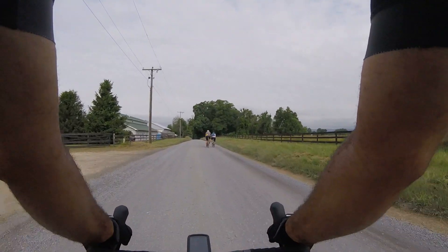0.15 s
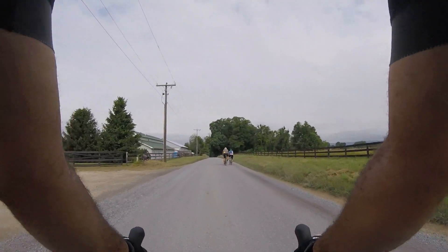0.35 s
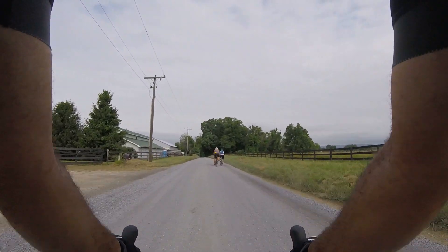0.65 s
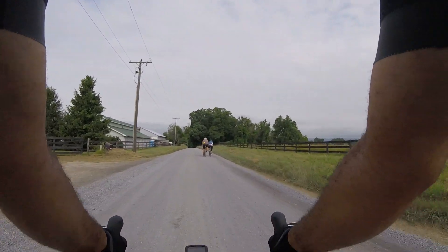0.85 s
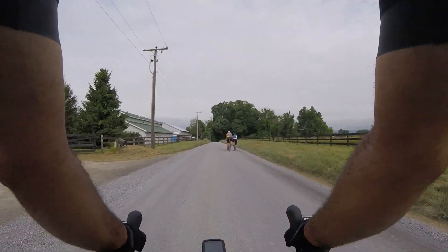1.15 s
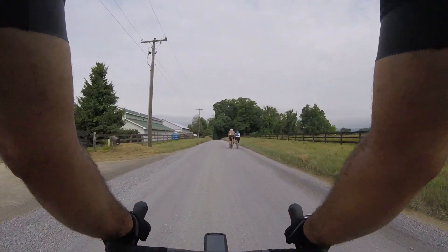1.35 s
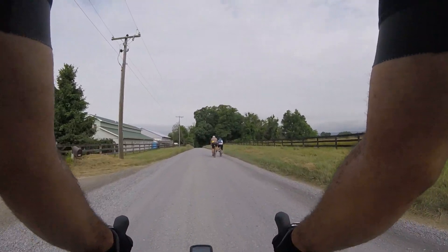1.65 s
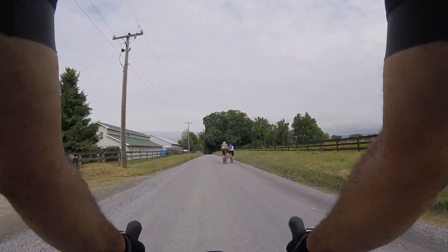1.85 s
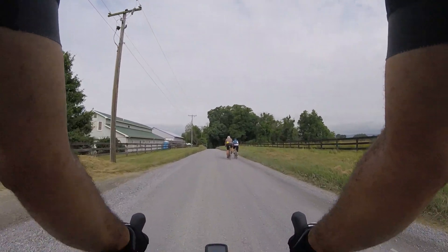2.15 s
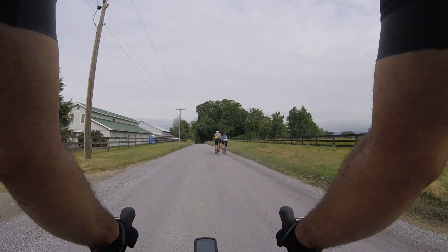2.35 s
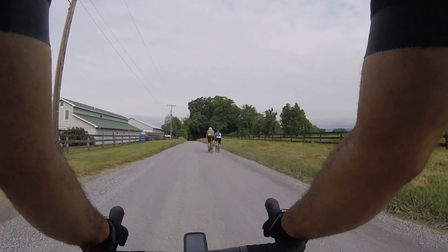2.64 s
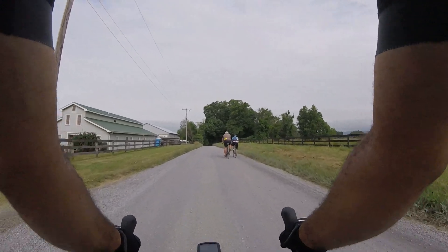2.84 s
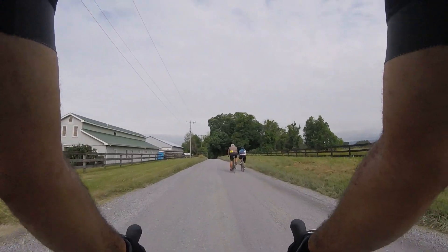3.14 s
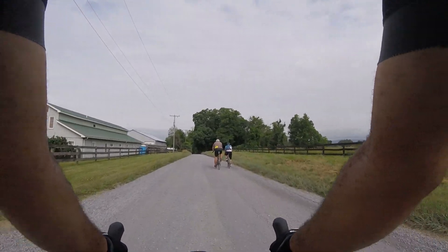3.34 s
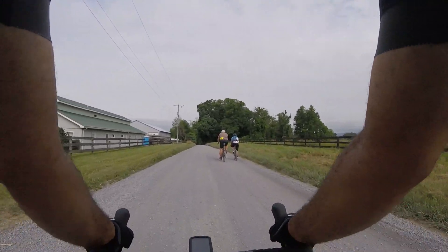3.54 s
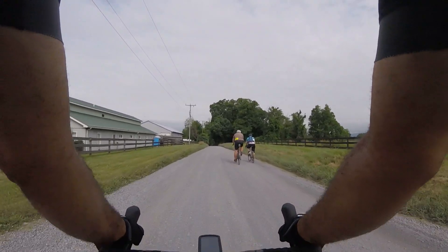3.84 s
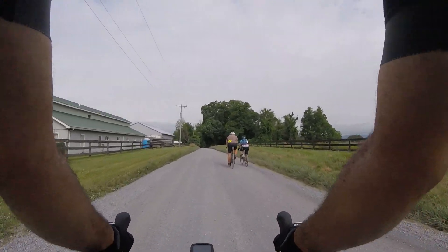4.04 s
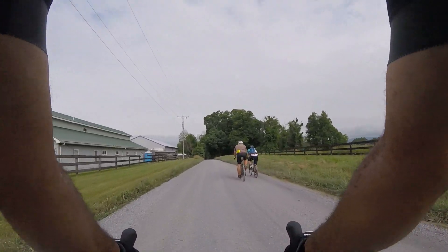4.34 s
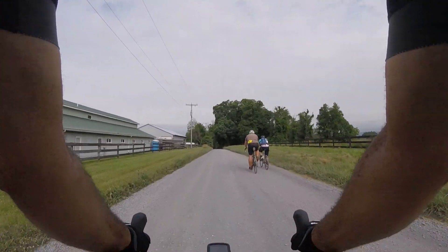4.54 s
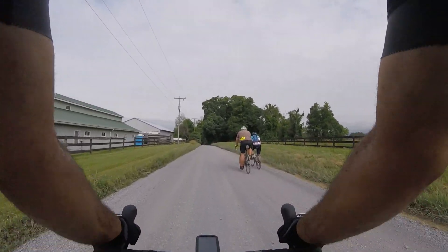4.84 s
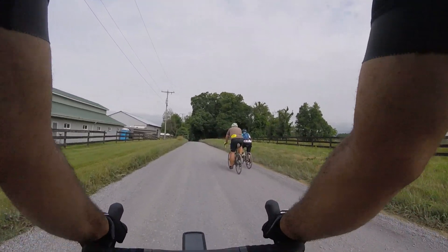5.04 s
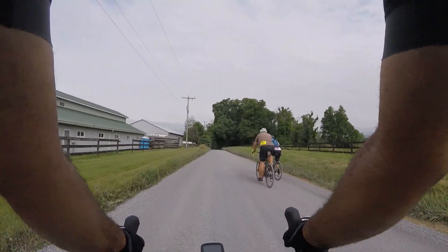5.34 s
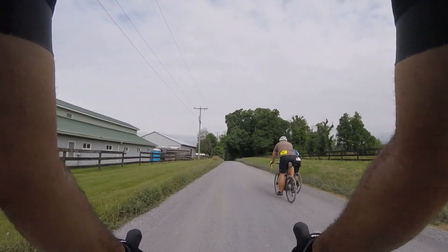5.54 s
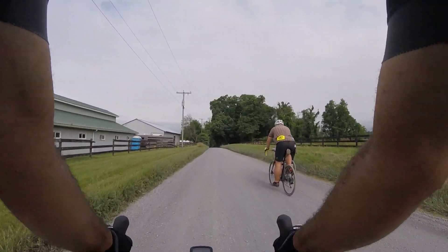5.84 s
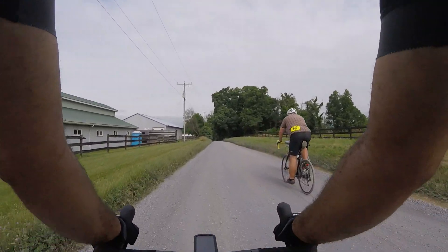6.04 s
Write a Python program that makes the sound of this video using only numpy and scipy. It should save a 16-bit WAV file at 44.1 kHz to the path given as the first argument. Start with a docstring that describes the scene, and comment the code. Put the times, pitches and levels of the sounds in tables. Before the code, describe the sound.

A bicycle rolls along a gravel road, heard in mono from a covered microphone on the rider's chest. Throughout, low wind rumble and jerky flutter buffet the microphone, much louder than the tyres' thin hiss, soft roar and fine grit crunch. A thin, high, slightly unsteady metallic ring, perhaps a bell, is present from 0 s, weakens after 1 s and vanishes by about 3.2 s. The opening is gusty, and the tyre noise then eases. Thumps and flapping slaps crowd 0.2-1.6 s, with more around 1.9-2.8 s. From 2.8 to 3.6 s slaps pause, leaving dense stone clicks, sharpest near 3.15 and 3.47 s. Strong thumps and slaps return at 3.65-4.15 s. Then they are sparser, with a gust near 4.9 s, while ticks continue. From 5.75 s to the end near 6.2 s, thumps, slaps and clustered stone rattles gather again. There is no echo.

```python
"""Wind buffets, thumps and slaps, tyres hiss and crunch on grit, stones tick, and a thin metal ring, perhaps
a bell, dies away at the start. The place is a gravel road, heard from a camera on a cyclist's chest: wind
strikes the microphone port directly, and tyres and bike frame are about a body's length away.
Wind and tyres are noise shaped in bands, slaps are bursts of noise, thumps are pressure pulses, stones ring
the resonances of the camera housing, and the ring is one unsteady sine."""
import sys
import numpy as np
from scipy import signal
from scipy.io import wavfile
from scipy.ndimage import uniform_filter1d

SR = 44100
rng = np.random.default_rng(int(sys.argv[2]) if len(sys.argv) > 2 else 0)


def store_wav(level_fs):
    """Save 16-bit WAV to argv[1]."""
    pcm = np.round(np.clip(np.atleast_2d(level_fs), -1, 1) * 32767)
    wavfile.write(sys.argv[1], SR, pcm.T.astype(np.int16))


N = 272846

# All levels are those ahead of the covered port, see record().
# Wind on the port, before buffets and swells:
# (time [s], big-eddy rumble level [dB], small-eddy flutter level [dB], smallest-eddy rustle level [dB])
WIND_LEVELS = [(0.0, -12, -15.5, -25), (0.03, -14.5, -34, -31.5), (0.15, -23, -30, -39),
               (0.19, -14, -14.5, -25.5), (0.24, -15.5, -22.5, -38), (0.27, -26, -15.5, -37),
               (0.31, -20.5, -30.5, -42), (0.65, -18, -25, -33), (0.67, -22.5, -26, -42),
               (0.86, -20, -21, -28), (0.9, -25, -37, -25), (0.95, -13.5, -24, -30),
               (1.01, -27, -26.5, -42.5), (1.27, -21.5, -22.5, -25.5), (1.33, -18.5, -23.5, -32.5),
               (1.41, -19, -22.5, -21.5), (1.46, -20.5, -24.5, -42), (1.58, -18.5, -20.5, -28),
               (1.65, -26.5, -35.5, -35.5), (1.86, -23, -36.5, -41.5), (1.9, -15.5, -18.5, -30),
               (1.95, -24, -32.5, -41), (2.15, -19, -23, -36), (2.21, -38, -41, -45), (2.24, -25, -29, -35),
               (2.43, -23, -32, -38), (2.57, -22.5, -20, -35), (2.65, -22.5, -46, -53),
               (2.69, -30, -17, -24), (2.74, -28, -26.5, -43), (2.91, -23, -20.5, -32.5),
               (2.95, -28.5, -35, -42.5), (3.2, -22.5, -25, -40.5), (3.41, -20, -28.5, -50),
               (3.48, -18.5, -21.5, -20), (3.51, -29, -35, -41), (3.57, -18.5, -22.5, -32.5),
               (3.74, -16.5, -22, -27), (3.96, -17.5, -23, -40.5), (4.03, -25, -14, -21),
               (4.07, -19.5, -30, -27.5), (4.14, -20.5, -18.5, -28), (4.22, -25.5, -32, -41),
               (4.36, -15, -26.5, -43), (4.41, -27.5, -33, -44), (4.67, -20, -40, -34.5),
               (4.7, -28, -61, -39), (4.79, -24, -39, -38), (4.89, -12, -25.5, -28.5),
               (4.93, -24, -27, -30.5), (5.14, -19.5, -21, -43), (5.17, -28.5, -32, -47),
               (5.31, -16, -21.5, -41), (5.46, -24.5, -37, -36.5), (5.79, -17, -20, -28.5),
               (5.89, -20.5, -21.5, -40), (5.94, -16, -17, -26), (6.03, -25, -34, -33),
               (6.17, -11.5, -18, -40), (6.19, -18, -33, -47)]
# Spectra of the three eddy sizes: (frequency [Hz], relative density [dB per Hz])
RUMBLE_SPECTRUM = [(8.8, -24), (15, 1.5), (64, 7.5), (138, -3.5), (300, -36), (390, -36.5), (660, -120)]
FLUTTER_SPECTRUM = [(70, -7.5), (110, 0), (170, -2), (260, -11.5), (400, -20)]
RUSTLE_SPECTRUM = [(200, 5), (290, -1), (400, -1.5), (550, -26.5), (800, -13), (1500, -36)]
# Tyres on the road, before each layer's trim: (time [s], hiss level [dB], low roar level [dB])
ROLLING_LEVELS = [(0.0, -34, -36), (0.41, -38, -43.5), (0.8, -37, -36.5), (0.92, -44.5, -42),
                  (1.41, -43, -40.5), (2.22, -43.5, -45.5), (3.08, -42, -43), (3.36, -38, -39.5),
                  (4.05, -39, -44), (4.24, -39.5, -40), (4.89, -38, -40.5), (5.6, -39.5, -44),
                  (5.93, -40, -38), (6.19, -38, -38.5)]
# Spectra of tread hiss, low roar and crushed grit: (frequency [Hz], relative density [dB per Hz])
HISS_SPECTRUM = [(1200, 3), (1800, -10.5), (2600, -1.5), (3500, -10.5), (4400, -13.5), (5500, -10),
                 (7000, -15), (8500, -20), (11000, -62), (14000, -70)]
ROAR_SPECTRUM = [(350, -10), (600, 0), (1000, -4.5), (1600, -11.5), (2500, -19.5)]
GRIT_SPECTRUM = [(1200, -29), (1800, 0.5), (2600, -1.5), (3500, -8), (4400, -20.5), (5500, -10),
                 (7000, -17.5), (9000, -45)]
# Narrow peaks of the port cavity, added to hiss and grit: (frequency [Hz], width [Hz], level [dB])
PORT_PEAKS = [(2810, 280, -8.5), (5410, 370, -5), (6520, 240, 4.5)]
# The ring fades, with short dips: (time [s], level [dB])
RING_LEVELS = [(0.0, -44), (0.1, -43), (0.21, -39), (0.36, -44), (0.43, -48), (0.48, -44), (0.54, -45),
               (0.61, -43.5), (0.63, -54), (0.645, -54), (0.665, -42), (0.69, -41.5), (0.75, -48),
               (0.82, -44.5), (0.9, -52), (0.94, -63), (1.04, -52), (1.2, -54), (1.29, -55), (1.34, -52),
               (1.54, -51), (1.58, -59), (1.63, -55), (1.71, -60), (1.75, -56), (1.84, -66), (1.88, -57),
               (1.92, -57), (2.0, -62), (2.1, -59), (2.2, -60), (2.36, -56), (2.43, -63), (2.49, -57),
               (2.56, -64), (2.84, -59), (2.95, -64), (3.2, -79)]
# Housing resonances, low to high: (frequency [Hz], width of one filter pass [Hz], relative level [dB])
HOUSING_MODES = [(1380, 930, -1.5), (2514, 1060, 3), (5320, 1000, 9), (6390, 1250, 9.5), (8500, 3560, -6.5)]
# Stones against the bike:
# (time [s], body peak level [dB], dull knock rms level [dB], bright snap rms level [dB])
STONE_HITS = [(0.024, -36, -29, -42), (0.1126, -23, -33, -53), (0.153, -19, -38, -51),
              (0.176, -16, -32, -38), (0.2404, -24, -41, -38), (0.2903, -26, -36, -41),
              (0.3845, -36, -45, -55), (0.402, -34, -32, -49), (0.4536, -23, -30, -41),
              (0.534, -28, -44, -44), (0.5656, -18.5, -42, -40), (0.611, -20.5, -40, -37),
              (0.617, -26, -35, -25), (0.739, -28, -36, -37.5), (0.8355, -23.5, -39, -45),
              (0.87, -22, -41, -36), (0.8975, -14, -23.5, -39), (0.903, -34, -47, -48),
              (0.934, -30, -42, -48), (0.996, -27, -44, -46), (1.111, -29, -40, -50),
              (1.126, -32, -46, -43), (1.186, -32, -43, -55), (1.263, -26, -41, -59),
              (1.3263, -21.5, -40, -40.5), (1.418, -19.5, -37, -40), (1.732, -22.5, -44, -37),
              (1.7928, -23.5, -32.5, -43), (1.8898, -20.5, -51, -53), (1.921, -28, -50, -49),
              (1.9904, -26, -52, -49), (2.088, -30, -50, -54), (2.161, -21, -46, -22.5),
              (2.166, -33, -46, -36), (2.2317, -28, -48, -46), (2.2572, -19.5, -38, -45),
              (2.3986, -20, -35.5, -38), (2.767, -27, -50, -40), (2.774, -26, -43, -50),
              (2.7877, -27, -50, -50), (2.861, -25, -39, -44), (2.908, -25, -44, -47),
              (3.1063, -26, -52, -54), (3.1176, -27, -46, -55), (3.136, -25, -39, -40),
              (3.148, -27, -46, -52), (3.1549, -15.5, -33, -50), (3.247, -34, -46, -36),
              (3.2567, -25, -34, -43), (3.2705, -34, -46, -43), (3.309, -36, -34, -50),
              (3.319, -26, -32, -39), (3.351, -21, -35, -41), (3.364, -26, -32, -41),
              (3.426, -24.5, -37, -45), (3.439, -25, -38, -50), (3.467, -13.5, -24, -38),
              (3.56, -15.5, -50, -58), (3.673, -25, -48, -43), (3.731, -32, -41, -50),
              (3.737, -25, -39, -33.5), (3.821, -26, -41, -50), (3.836, -17, -31.5, -55),
              (3.9648, -23, -45, -38.5), (3.999, -26, -46, -44), (4.1745, -22.5, -31, -41),
              (4.237, -31, -25.5, -59), (4.249, -20, -34, -54), (4.434, -28, -46, -45),
              (4.448, -33, -30, -51), (4.577, -24, -40, -41), (4.611, -26, -35, -43),
              (4.629, -25, -33, -44), (4.6861, -19, -50, -40), (4.737, -23, -31, -38),
              (4.794, -28, -46, -48), (4.802, -22.5, -46, -44), (4.811, -25, -42, -38),
              (4.9127, -19, -30.5, -34), (4.92, -24, -38, -37), (5.042, -34, -31, -46),
              (5.242, -23, -45, -54), (5.324, -18, -31, -51), (5.3873, -27, -46, -40),
              (5.452, -24, -40, -35), (5.518, -23.5, -37.5, -38), (5.607, -21, -30, -33.5),
              (5.639, -28, -42, -52), (5.81, -43, -51, -39.5), (5.8955, -30, -32, -34.5),
              (5.901, -17.5, -33, -41), (5.917, -27, -36, -46), (5.947, -25, -28.5, -36.5),
              (5.957, -25, -39, -53), (6.0032, -18.5, -32, -42), (6.0155, -19.5, -21.5, -46),
              (6.055, -28, -41, -50), (6.106, -22, -46, -48), (6.12, -25, -26, -35), (6.133, -26, -42, -35)]
# The largest eddies thump on the port:
# (time [s], peak level [dB], half width [ms], direction [push 1, pull -1])
THUMP_EVENTS = [(0.1932, -4.6, 2.01, 1), (0.275, -4.0, 0.92, 1), (0.5746, -5.9, 3.75, 1),
                (0.6076, -8.4, 2.45, 1), (0.6464, -6.3, 1.93, 1), (0.7311, -8.4, 2.06, -1),
                (0.8412, -8.1, 0.93, 1), (0.8659, -8.5, 2.07, 1), (0.9355, -5.0, 1.46, 1),
                (0.957, -4.8, 1.09, 1), (1.249, -6.6, 1.72, -1), (1.2793, -6.3, 1.86, 1),
                (1.3613, -8.7, 1.39, 1), (1.3913, -7.5, 1.44, -1), (1.4063, -7.9, 1.36, -1),
                (1.4269, -7.1, 1.66, 1), (1.8921, -5.2, 1.67, 1), (2.1397, -8.0, 1.16, 1),
                (2.5746, -7.6, 1.6, 1), (2.7045, -5.4, 1.79, -1), (3.5702, -8.6, 1.27, 1),
                (3.6561, -6.2, 4.43, 1), (3.7146, -5.4, 1.3, -1), (3.7683, -8.5, 3.34, 1),
                (3.8959, -2.5, 2.09, 1), (3.9408, -8.8, 2.3, -1), (4.0095, -8.5, 1.58, -1),
                (4.0333, -5.7, 1.3, 1), (4.0455, -7.4, 1.33, 1), (4.1083, -8.8, 1.62, 1),
                (4.1317, -5.9, 5.19, -1), (4.9088, -7.2, 3.09, -1), (5.7513, -7.1, 2.48, 1),
                (5.7689, -7.5, 1.22, 1), (5.7958, -8.5, 4.12, 1), (5.934, -5.1, 1.77, 1),
                (6.0878, -7.6, 3.2, -1), (6.1619, -4.8, 2.71, 1)]
# Sharp slaps of air on the port:
# (time [s], dull body peak level [dB], length scale [s], crisp edge peak level [dB], edge pitch [Hz])
SLAP_EVENTS = [(0.271, -14.5, 0.014, -37, 550), (0.567, -16.5, 0.01, -38, 590),
               (0.835, -21, 0.015, -33, 700), (0.868, -22.5, 0.01, -31, 950),
               (0.935, -28, 0.0052, -26, 700), (0.953, -14, 0.015, -17, 1000),
               (1.108, -20.5, 0.02, -30, 900), (1.202, -26.5, 0.0049, -38, 1400),
               (1.215, -30, 0.0055, -22, 1540), (1.226, -17.5, 0.006, -25, 1700),
               (1.229, -10, 0.0076, -21.5, 900), (1.279, -15, 0.006, -28, 800),
               (1.379, -28.5, 0.0074, -27, 1500), (1.391, -17, 0.011, -15, 1040),
               (1.397, -25, 0.025, -24, 1300), (1.398, -22, 0.016, -26, 2200),
               (1.417, -30, 0.009, -26, 1000), (1.425, -15, 0.015, -33, 1500),
               (1.515, -25, 0.0044, -26, 1100), (1.531, -28, 0.021, -28, 1100),
               (1.564, -17, 0.01, -19.5, 1010), (1.582, -43, 0.0073, -16, 1120),
               (1.589, -25, 0.014, -28, 1000), (1.664, -22.5, 0.01, -35, 600),
               (1.893, -22, 0.0093, -26, 700), (1.993, -14.5, 0.016, -23, 1090),
               (2.058, -25.5, 0.0061, -41, 600), (2.065, -24, 0.0044, -22.5, 900),
               (2.078, -17.5, 0.0095, -35, 800), (2.138, -36, 0.0086, -24.5, 810),
               (2.145, -16, 0.014, -31, 1080), (2.538, -27, 0.0065, -21.5, 1100),
               (2.577, -19.5, 0.0055, -35, 800), (2.684, -21, 0.017, -28, 800),
               (2.6914, -26.5, 0.0053, -17, 1160), (2.702, -19.5, 0.006, -16, 1010),
               (2.788, -24.5, 0.0065, -41, 600), (2.834, -25, 0.0088, -31, 900),
               (3.666, -22.5, 0.0079, -35, 650), (3.714, -18, 0.0094, -22.5, 800),
               (3.894, -26, 0.014, -27, 700), (3.996, -15.5, 0.0098, -33, 600),
               (4.021, -13, 0.015, -33, 600), (4.108, -17.5, 0.025, -31, 700),
               (4.128, -11.5, 0.012, -19, 1030), (4.61, -26, 0.008, -28, 700),
               (4.854, -24.5, 0.024, -40, 550), (4.885, -23, 0.02, -35, 600),
               (5.085, -27, 0.0031, -26, 900), (5.774, -31, 0.011, -26, 800),
               (5.865, -25, 0.015, -31, 1540), (5.94, -27, 0.0067, -28, 810),
               (5.992, -22.5, 0.02, -31, 700), (6.051, -31, 0.024, -21.5, 715),
               (6.115, -34, 0.0085, -28, 780), (6.135, -34, 0.0052, -22.5, 850)]

BUFFET_DB, BUFFET_RATE_HZ = 1, 34   # chance swells that shake all eddies together
# The wind swells round each slap, more for stronger slaps: half width [s], rise [dB], extra [dB per dB]
SWELL_S, SWELL_DB, SWELL_FOLLOWS = 0.0055, 4, 0.16
EDDIES_PER_S = 260   # single eddies that sound in flutter and rustle at once, before lumps crowd them
EDDY_SHARE = 0.49    # their share of the power, the rest is steady noise
GRAINS_PER_S = 900   # grit crushed, before its density wavers
RING_HZ = 3760
STONE_RISE_S = 0.0006   # each knock swells in over this time
THUMP_POINT_MS = 0.9    # rounding of a thump's pointed tip
EDGE_WIDTH = 0.5        # width of a slap's crisp edge as a share of its pitch
CUTOFF_HZ = 13900       # from here up the treble is at least 50 dB down


def amp(db):
    """Turn decibels into an amplitude factor."""
    return 10 ** (np.asarray(db) / 20)


def rms_one(x):
    """Scale a signal to an rms of 1."""
    return x / np.sqrt(np.mean(x ** 2) + 1e-20)


def in_time(rows):
    """Draw each column of a table as a curve with one value per sample."""
    s, *columns = np.transpose(rows)
    return [np.interp(np.arange(N) / SR, s, column) for column in columns]


def drift(rate_hz):
    """Slow chance of spread 1: noise at every 20th sample through a double one-pole low-pass."""
    r = np.exp(-2 * np.pi * rate_hz * 20 / SR)
    noise = rng.standard_normal(N // 20 + 2002)
    slow = signal.lfilter([1], [1, -2 * r, r * r], noise)[2000:]   # drop the settling time
    return np.interp(np.arange(N) / 20, np.arange(len(slow)), rms_one(slow))


def resonance(x, hz, width):
    """A two-pole resonance whose peak has a gain of 1."""
    r = np.exp(-np.pi * width / SR)
    zeros = np.array([1, 0, -1]) * (1 - r * r) / 2
    poles = [1, -2 * r * np.cos(2 * np.pi * hz / SR), r * r]
    return signal.lfilter(zeros, poles, x + 1e-18)


def bandpass(x, low, high):
    """Keep the sound between two frequencies in Hz."""
    return signal.sosfilt(signal.butter(2, [low, high], "band", fs=SR, output="sos"), x)


def banded(source, spectrum, shared_db, own_db, own_rate):
    """Third-octave bands of two sources in turn, with a level, a shared change and a flicker of their own."""
    hz, density_db = np.transpose(spectrum)
    edges = hz[0] * 2 ** np.arange(0, np.log2(hz[-1] / hz[0]) + .01, 1 / 3)
    out = 0
    for k, (low, high) in enumerate(zip(edges, edges[1:])):
        band = bandpass(source[k % 2], low, high)
        level_db = np.interp(np.log(low * high) / 2, np.log(hz), density_db)
        flicker_db = own_db * drift(own_rate)
        out = out + amp(level_db + shared_db + flicker_db) * band
    return rms_one(out)


def evened(x, window_s):
    """Divide by the running level, which flattens most of the chance swells of narrow noise."""
    local_power = uniform_filter1d(x * x, round(window_s * SR))
    return rms_one(x / np.sqrt(local_power + 0.066))


def slap_swell():
    """The wind rises in dB around every slap; where rises overlap the largest counts."""
    t = np.arange(N) / SR
    coarse_t = t[::20]
    body_db = np.array(SLAP_EVENTS)[:, 1]
    rises_db = np.maximum(SWELL_DB + SWELL_FOLLOWS * (body_db - np.mean(body_db)), 0)
    swells = [rise_db * np.exp(-((coarse_t - s) / SWELL_S) ** 2)
              for (s, *_), rise_db in zip(SLAP_EVENTS, rises_db)]
    return np.interp(t, coarse_t, np.max(swells, axis=0))


def wind():
    """Big eddies rumble on the port; small ones burst singly and in lumps, so flutter and rustle are jerky."""
    rumble_db, flutter_db, rustle_db = in_time(WIND_LEVELS)
    buffet = BUFFET_DB * drift(BUFFET_RATE_HZ)
    swell = slap_swell()
    rumble_noise = rng.standard_normal((2, N))
    rumble = evened(banded(rumble_noise, RUMBLE_SPECTRUM, 0, own_db=0.0, own_rate=18.0), window_s=0.14)

    lumps = drift(43.0)
    eddy_born = rng.random(N) < EDDIES_PER_S * amp(3.0 * lumps) / SR
    bursts = rms_one(eddy_born * rng.standard_normal(N))
    steady = rng.standard_normal((2, 2, N))
    eddies = np.sqrt(EDDY_SHARE) * bursts + np.sqrt(1 - EDDY_SHARE) * steady
    flutter = evened(banded(eddies[0], FLUTTER_SPECTRUM, 0, own_db=2.5, own_rate=12.2), window_s=0.038)
    rustle = evened(banded(eddies[1], RUSTLE_SPECTRUM, 0, own_db=3.5, own_rate=23.0), window_s=0.086)

    rumble_gain = amp(rumble_db + 0.24 * swell + 1.75 * buffet)
    flutter_gain = amp(flutter_db + swell + 1.7 * buffet + 2.0 * lumps)
    rustle_gain = amp(rustle_db + swell + 1.2 * buffet + 1.5 * lumps)
    return rumble_gain * rumble + flutter_gain * flutter + rustle_gain * rustle


def crushed_grit():
    """Grains of chance size break at chance moments, each a noise burst that decays in about 0.3 ms."""
    sizes = amp(6.0 * np.minimum(rng.exponential(1, (2, N)), 1.8))
    breaks = rng.random((2, N)) < GRAINS_PER_S * amp(1.8 * drift(30)) / SR
    fade = np.exp(-1 / (0.0003 * SR))
    envelope = signal.lfilter([1], [1, -fade], sizes * breaks)
    crunch = envelope * rng.standard_normal((2, N))
    return banded(crunch, GRIT_SPECTRUM, 0, own_db=2.5, own_rate=60.0)


def tyres():
    """Tread hiss and crushed grit are coloured by the port cavity; a lower roar lies beneath them."""
    hiss_db, roar_db = in_time(ROLLING_LEVELS)
    hiss = banded(rng.standard_normal((2, N)), HISS_SPECTRUM, 1.2 * drift(19), own_db=1.2, own_rate=28.0)
    roar = banded(rng.standard_normal((2, N)), ROAR_SPECTRUM, 2.4 * drift(88), own_db=1.0, own_rate=12)
    tread = amp(hiss_db - 6.0) * hiss + amp(hiss_db - 5.0) * crushed_grit()
    peaks = sum(amp(level_db) * resonance(tread, hz, width) for hz, width, level_db in PORT_PEAKS)
    return tread + peaks + amp(roar_db - 3.0) * roar


def ring():
    """One sine partial with a slightly unsteady pitch and level sinks away in uneven steps."""
    level_db, = in_time(RING_LEVELS)
    pitch_hz = RING_HZ + 2.4 * drift(7.2)
    phase = 2 * np.pi * np.cumsum(pitch_hz) / SR
    unsteady_db = 0.4 * drift(12) + 1.2 * drift(40)
    return np.sqrt(2) * amp(level_db + unsteady_db) * np.sin(phase)   # root 2: levels are rms


def knocks(at_s, peak_db, modes, decay_s, click):
    """A click within a short swelling and fading noise burst rings resonances, set to a peak level."""
    out, t = np.zeros(N + 800), np.arange(800) / SR
    burst = (1 - np.exp(-t / STONE_RISE_S)) * np.exp(-t / decay_s)
    click_shape = click * (np.arange(len(t)) == round(STONE_RISE_S * SR))
    blows = rng.standard_normal((len(at_s), len(t))) * burst + click_shape
    rings = 0
    for hz, width, level_db in modes:
        narrow = resonance(resonance(blows, hz, width), hz, width)
        rings = rings + amp(level_db) * resonance(narrow, hz, 2 * width)   # three passes: steep skirts
    for s, db, one in zip(at_s, peak_db, rings):
        i = round(s * SR)
        out[i:i + len(t)] += amp(db) * one / np.abs(one).max()
    return out[:N]


def stones():
    """Each stone rings the low, middle and high housing resonances with its own strengths."""
    s, body_db, dull_db, bright_db = np.transpose(STONE_HITS)
    crest_db = 6.0   # a short knock is taken to peak this far above its rms level
    dull = knocks(s, dull_db + crest_db, HOUSING_MODES[:1], decay_s=0.0033, click=9.8)
    body = knocks(s, body_db, HOUSING_MODES[1:2], decay_s=0.0024, click=9.7)
    bright = knocks(s, bright_db + crest_db, HOUSING_MODES[2:], decay_s=0.0038, click=2.5)
    return dull + body + bright


def thumps():
    """A large eddy gives a pointed push of pressure between two shallower pulls, or the reverse."""
    out, ms = np.zeros(N + 2000), np.arange(-1000, 1000) * 1000 / SR
    for s, db, half_ms, way in THUMP_EVENTS:
        i = round(s * SR) - 1000
        rounded_ms = np.hypot(ms, THUMP_POINT_MS) - THUMP_POINT_MS
        u = rounded_ms / (1.07 * half_ms)
        out[i:i + len(u)] += np.sign(way) * amp(db - 0.2) * (1 - u) * np.exp(-u)
    return out[:N]


def slaps():
    """Air slaps the port: a short swell of dull noise with a crisper edge, each set to its peak level."""
    out, t = np.zeros(N + 2000), np.arange(2000) / SR
    white = rng.standard_normal((len(SLAP_EVENTS), 2, 2 * len(t)))
    dull = bandpass(white[:, 0], 200, 540)[:, len(t):]   # the first half lets the filters settle
    for (s, db, length, edge_db, hz), dull_noise, noise in zip(SLAP_EVENTS, dull, white[:, 1]):
        shape = (t / length) ** 2 * np.exp(-t / length * 6.13)
        width = EDGE_WIDTH * hz
        crisp_noise = resonance(resonance(noise, hz, width), hz, 1.16 * width)[len(t):]
        body, edge = shape * dull_noise, shape * crisp_noise
        i = max(round((s - .001) * SR), 0)   # the swell begins 1 ms ahead of the listed time
        out[i:i + len(t)] += amp(db) * body / np.abs(body).max()
        out[i:i + len(t)] += amp(edge_db) * edge / np.abs(edge).max()
    return out[:N]


def scene():
    """All sources added at the microphone, one channel."""
    return (wind() + tyres() + ring() + stones() + thumps() + slaps())[None]


def record(dry):
    """The covered port dulls the treble, peaks are rounded, and the top is cut."""
    dulled = signal.sosfilt(signal.butter(2, 9000, fs=SR, output="sos"), dry)
    rounded = 0.86 * np.tanh(dulled / 0.94)
    return signal.sosfilt(signal.cheby2(12, 50, CUTOFF_HZ, fs=SR, output="sos"), rounded)


dry = scene()
out = record(dry)
store_wav(out)
```